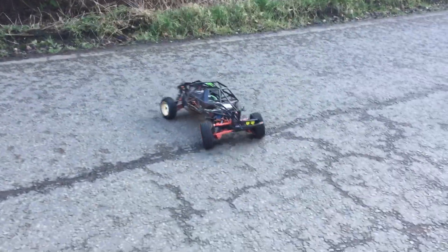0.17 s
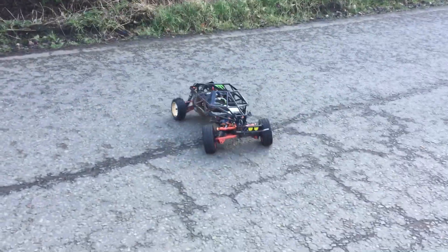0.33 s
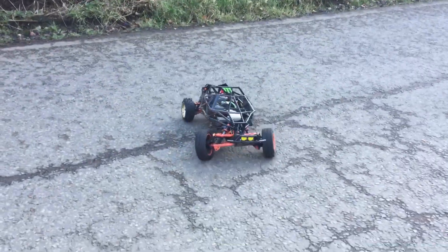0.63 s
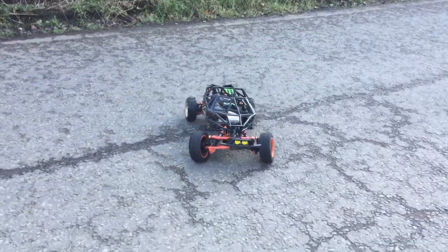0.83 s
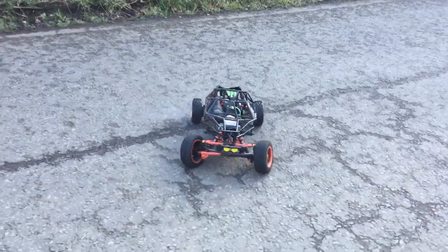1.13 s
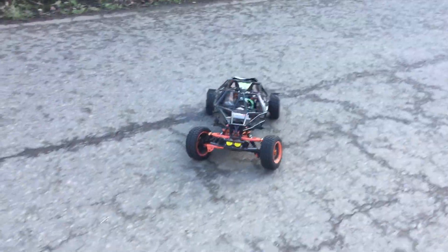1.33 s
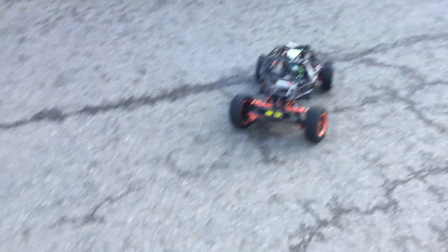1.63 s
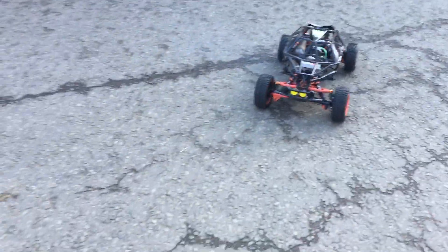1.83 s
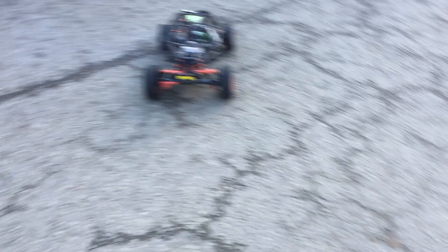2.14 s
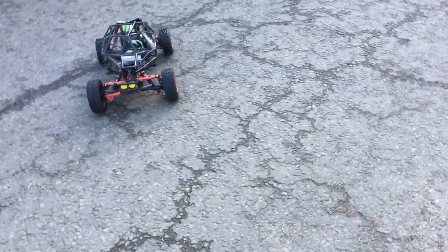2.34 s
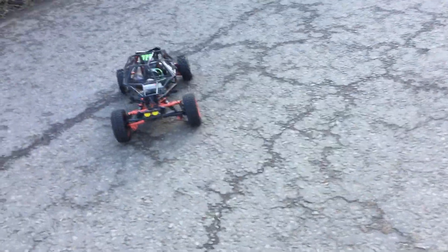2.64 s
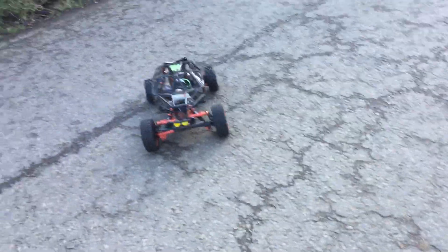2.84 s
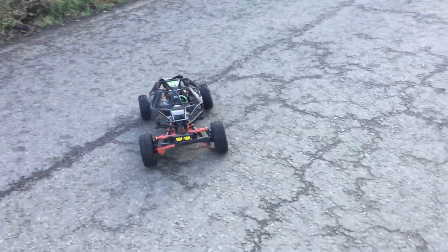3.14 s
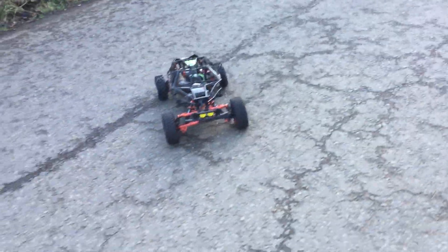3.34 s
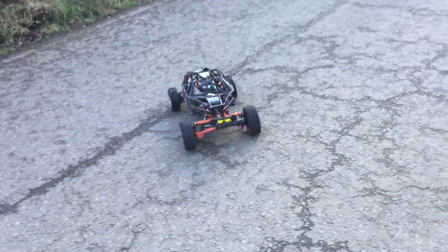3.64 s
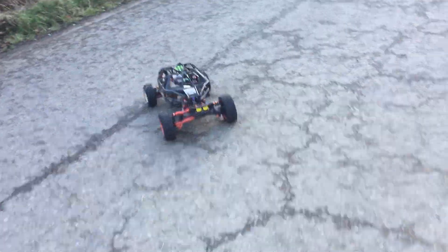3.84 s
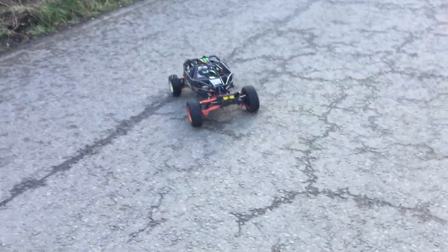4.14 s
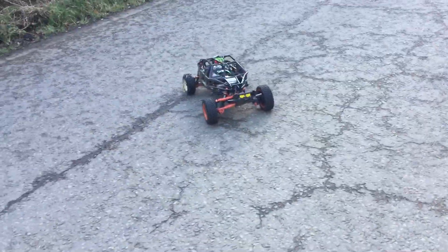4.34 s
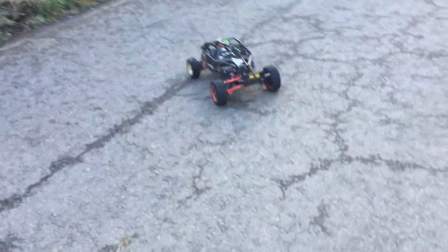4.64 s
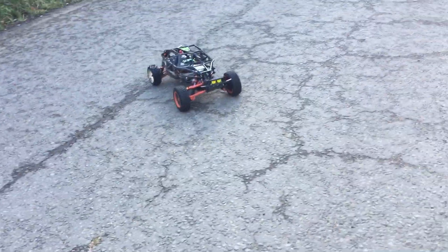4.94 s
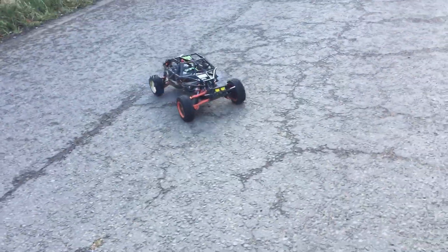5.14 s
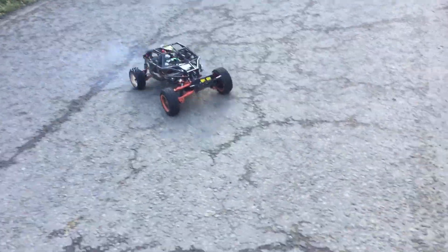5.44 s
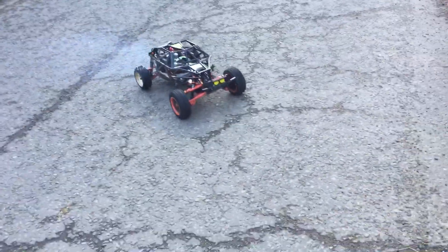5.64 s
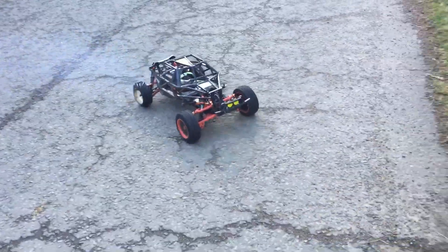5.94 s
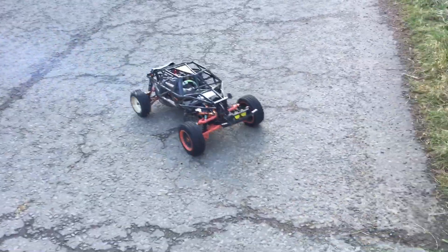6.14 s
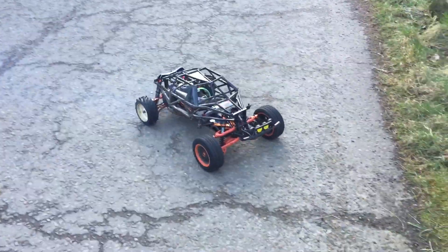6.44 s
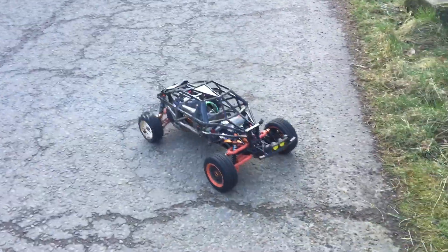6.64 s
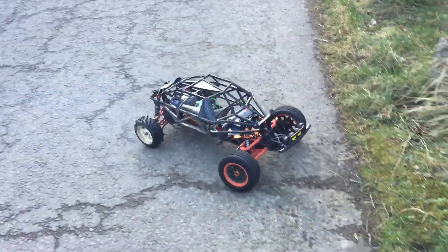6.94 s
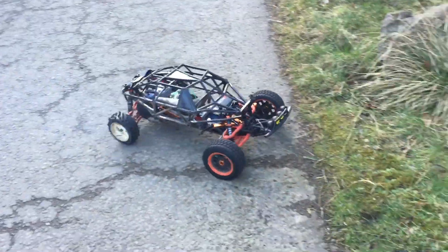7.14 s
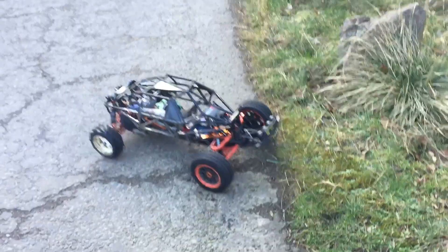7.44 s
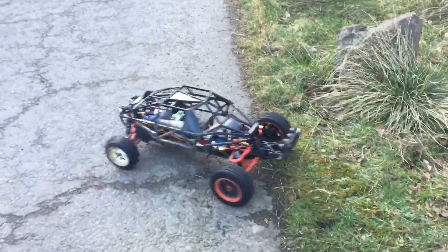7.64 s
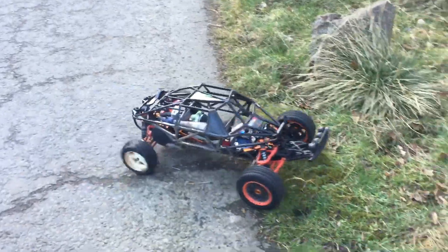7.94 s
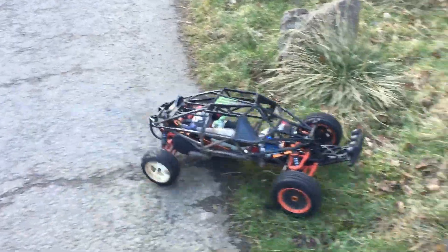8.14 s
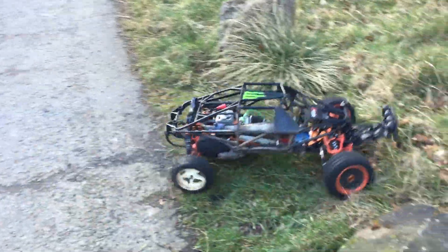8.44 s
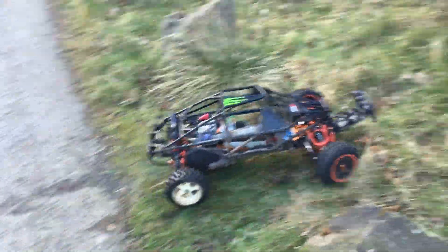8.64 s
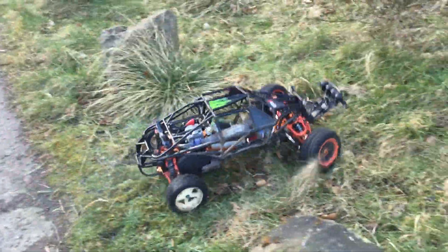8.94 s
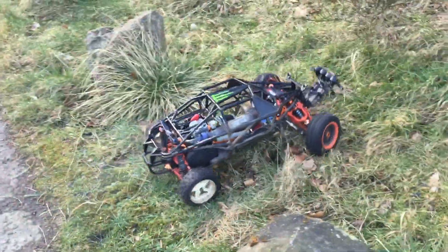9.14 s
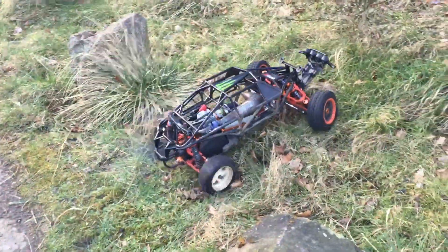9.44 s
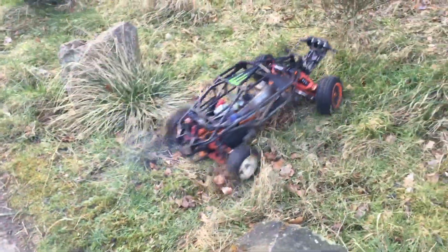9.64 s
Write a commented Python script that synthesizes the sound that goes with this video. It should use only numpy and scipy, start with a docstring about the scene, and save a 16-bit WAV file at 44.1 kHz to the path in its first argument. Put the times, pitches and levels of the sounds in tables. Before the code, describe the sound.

A model buggy's small two-stroke engine runs close to the microphone outdoors, thudding and clattering, with irregular sharp pops that ring in its metal silencer. At about 0.5 and 0.9 seconds, two quick throttle blips give a bright, buzzing rasp and coast down. From 1.5 to 4.5 seconds it idles unevenly with scattered pops; a faint gear whine passes around 2 seconds and a faint low hum around 4.5. A small blip at 4.5 leads into three sharp revs at 4.8, 5 and 5.4 seconds. A louder, more nasal rev barks at 6.2, followed by idle and a cluster of blips from 7.2 to 8 seconds. The clutch rings faintly near 6 and 8.6 seconds. Three more revs come at 8.7, 9.1 and 9.5 seconds, the last the longest and highest. The loudest peaks slightly overload the microphone.

```python
"""Two-stroke model buggy in a lane

A model buggy with a small petrol engine creeps along a lane and up a grass verge, near the microphone.
Off the throttle the engine thuds, clatters and fires only now and then, a sharp pop in the silencer.
On each blip of the throttle it fires on every turn, a bright rasp that overloads the microphone,
then coasts down. Beneath it the clutch bell rings twice, and a faint gear whine and a hum come and go."""
import sys
import numpy as np
from scipy import signal
from scipy.fft import rfft, irfft
from scipy.io import wavfile
from scipy.ndimage import uniform_filter1d

SR = 44100
rng = np.random.default_rng(int(sys.argv[2]) if len(sys.argv) > 2 else 0)


def waveform_to_disk(signal):
    """Save audio, clipped to [-1, 1], as 16-bit WAV at the path in sys.argv[1]."""
    frames = np.transpose(np.atleast_2d(signal))
    scaled = np.clip(frames, -1, 1) * 32767
    samples = np.round(scaled).astype(np.int16)
    wavfile.write(sys.argv[1], SR, samples)


N = 431735
TIME = np.arange(N) / SR

# Throttle blips, close to the microphone; levels are relative within each column:
# start_s, length_s, run_up_s, top_speed_hz, coast_time_constant_s, note_db, rasp_db, ring_db
THROTTLE_BLIPS = [ (0.502, 0.14, 0.14, 153, 0.25, -10, -6.5, -20),
                  (0.935, 0.15, 0.13, 169.6, 0.19, -13.5, -7, -14),
                  (4.495, 0.088, 0.082, 89.77, .25, -13, -15, -20),
                  (4.753, 0.13, .1, 161.4, 0.22, -12, -5.5, -16),
                  (5.029, .155, .068, 168.1, .302, -14.5, -7, -24.5),
                  (5.422, 0.17, 0.078, 169, 0.27, -17, -8, -23),
                  (6.222, 0.14, 0.087, 162.2, 0.23, -2.5, -6, -35),
                  (7.204, 0.056, 0.059, 104, .2, -18.5, -21, -36),
                  (7.371, 0.13, 0.11, 138, 0.15, -7.5, -14.5, -32),
                  (7.556, .13, .05, 162.9, .273, -3, -9, -23),
                  (7.937, 0.17, 0.083, 167.8, 0.31, -5, -10.5, -21),
                  (8.741, 0.17, 0.11, 165.8, 0.26, -7, -10.5, -18.5),
                  (9.121, 0.17, 0.086, 158.4, 0.22, -5.5, -11, -23.5),
                  (9.485, 0.29, 0.14, 175.7, 0.31, -5, -12.5, -22), ]
# Where the microphone sees the buggy from: time_s, view (0 ahead, 1 side, 2 behind)
MIC_VIEW = [(5.6,0),(6.3,1),(8.3,1),(9.25,1.4),(9.55,2)]
# The exhaust note from those three sides, and the rasp of its gas: frequency_hz, relative_db
AHEAD_SPECTRUM = [(180,-9.5),(300,-1.5),(450,-10.5),(660,-1.5),(1000,-1.5),(1500,2),(3500,-17)]
SIDE_SPECTRUM = [(200,-14),(300,-10),(450,-27.5),(650,-20),(970,-6.5),(1250,-13.5),(1750,-2),(2600,-7),(4000,-9.5)]
BEHIND_SPECTRUM = [(200,-20),(340,-3.5),(520,-26),(700,-4.5),(880,-3.5),(1050,-0.5),(1280,5.5),(1800,1),(2800,-15),(4000,-5.5),(5400,-25),(6300,-6),(7500,-6)]
RASP_SPECTRUM = [(1350, -18), (2300, -1.5), (3930, 0.5), (4400, 2), (5440, -5), (6090, -7), (8030, -5),
                 (13300, -8), (16000, -8.5)]
# Levels against a blip's peak: start_db, throttle_shut_db, run_on_end_db
NOTE_SHAPE, RASP_SHAPE, GULP_SHAPE = (-6.5, -5, -11.5), (-5.5, -3, -15), (0, -6.5, -8)

def exhaust(speed, tailpipe_hz=6160, width_hz=540):
    """Under throttle every turn fires: a pitched note, a rasp of gas and a metallic tailpipe ring."""
    *_, note_db, rasp_db, ring_db = np.transpose(THROTTLE_BLIPS)
    firings = strokes(speed, 0, jitter_s=.000008, spread_db=1)
    pulses = even(scatter(firings, t60=.025, share=1.4))
    ragged = np.clip((165 - speed) / 50, 0, 1)   # combustion cleans up as the revs rise
    gas = even(puffs(firings, t60=.045))
    pipe = pulses + (.12 + .6 * ragged) * gas
    view, = in_time(MIC_VIEW)
    sides = [even(colour(pipe, side)) for side in (AHEAD_SPECTRUM, SIDE_SPECTRUM, BEHIND_SPECTRUM)]
    note = even(sum(np.maximum(0, 1 - abs(view - k)) * side for k, side in enumerate(sides)))
    jet = .7 * pulses + .5 * even(firings) + .55 * port_bursts(speed) + (.3 + .7 * ragged) * gas
    rasp = even(colour(jet, RASP_SPECTRUM) + .27 * silencer(jet))
    ring = even(resonate(resonate(jet, tailpipe_hz, width_hz), tailpipe_hz, 2 * width_hz))
    return (from_db(-3) * throttle(note_db, NOTE_SHAPE) * note
            + throttle(rasp_db, RASP_SHAPE) * rasp
            + throttle(ring_db, RASP_SHAPE) * ring)


def port_bursts(speed, harmonics=64, size=2048):
    """Gas leaves the port in a jagged burst that repeats every turn and changes shape with each blip."""
    count = len(THROTTLE_BLIPS)
    bursts = rng.standard_normal((count, size)) * np.exp(-3 * np.arange(size) / size)
    overtones = rfft(bursts)[:, :harmonics] * from_db(3 * rng.standard_normal((count, harmonics)))
    overtones[:, 0] = 0
    blip = np.searchsorted([s for s, *_ in THROTTLE_BLIPS[1:]], TIME)
    turns = np.cumsum(speed) / SR
    return even(irfft(overtones, size)[blip, (turns % 1 * size).astype(int)])


def throttle(levels_db, shape, attack_s=.0027, run_on_s=.037, release_s=.055, peak_share=.44):
    """Gain over all blips: each starts abruptly, peaks, eases off and runs on for a few turns."""
    start, shut, end = from_db(shape)
    gain = np.zeros(N)
    for (s, length, *_), db in zip(THROTTLE_BLIPS, levels_db):
        stages = [-attack_s, 0, peak_share * length, length,
                  length + run_on_s, length + run_on_s + release_s]
        gain += from_db(db) * np.interp(TIME - s, stages, [0, start, 1, shut, end, 0])
    return gain


# Crank speed with the throttle shut, higher while the buggy rolls: time_s, speed_hz
IDLE_REVS = [(0, 52.7), (.29, 53), (.46, 58), (.7, 70.6), (1.8, 78), (2.35, 65), (2.54, 51.5), (3, 58.3),
             (4.1, 48.6), (4.43, 53), (4.7, 79), (5, 71.3), (7.17, 76), (7.7, 71)]

def crank_speed(inertia_s=.056):
    """Turns a second: each blip runs the engine up, it coasts back, the flywheel rounds each change."""
    idle, = in_time(IDLE_REVS)
    speed = idle
    for s, length, run_up, top, coast, *_ in THROTTLE_BLIPS:
        driven = np.interp(TIME, [s, s + run_up], [speed[int(s * SR)], top])
        coasting = np.exp(-np.maximum(TIME - s - length, 0) / coast)
        speed = np.where(TIME < s, speed, idle + (driven - idle) * coasting)
    return smooth(speed, int(inertia_s * SR))


# Loud single firings at close range: time_s, relative_db
LOUD_FIRINGS = [(0.023, -10), (0.395, -5), (0.4692, -1.5), (0.5255, -8), (1.6314, -12.5), (1.7694, -12.5),
                (1.8218, 2), (2.4398, -1.5), (2.5593, -1.5), (2.6258, -9.5), (2.6939, -0.5),
                (2.9777, -11.5), (3.0467, -15), (3.1732, -12), (3.2271, -15), (3.4101, -9), (3.5188, -2.5),
                (3.6454, -11.5), (3.702, -2.5), (3.9651, -6), (4.2355, -12.5), (4.4458, -2), (4.5474, -7),
                (4.568, 0.5), (4.773, 4), (4.9198, -2), (5.247, -4), (5.663, -4.5), (6.7654, -3.5),
                (6.9236, -15.5), (7.1659, -5.5), (7.235, -3), (7.2557, -2.5), (7.404, -5), (8.1689, -9.5)]
# Their blast of gas: frequency_hz, relative_db
BLAST_SPECTRUM = [(240, -24), (400, -11.5), (1160, -14), (1760, 7.5), (3260, -1), (4380, -23.5), (4730, -2),
                  (15000, -16), (16000, -23)]

def pops(speed, first_db=-7):
    """A lone firing cracks, blasts gas and rings the silencer; weak ones are mostly a dull knock."""
    first_of_blip = [(s, first_db) for s, *_ in THROTTLE_BLIPS]
    times, db = np.vstack([LOUD_FIRINGS, first_of_blip, weak_firings(speed)]).T
    kicks = clicks(times, from_db(db))
    blast = colour(puffs(kicks, t60=.057) + 14 * kicks, BLAST_SPECTRUM)
    ring = silencer(2 * puffs(kicks, t60=.0047) + 18 * kicks)
    blows = clicks(times, from_db(.3 * db))   # the knock varies far less than the blast
    knock = colour(puffs(blows, t60=.063) + 16 * blows, IDLE_METAL_SPECTRUM)
    return from_db(-8) * (blast + ring) + from_db(-18.5) * knock


def weak_firings(speed, below_hz=84, every_turns=4.9, relative_db=-21.5, spread_db=3):
    """A slow engine fires weakly every few turns; gives rows of time_s, relative_db."""
    turns = np.cumsum(speed) / SR
    chance = rng.standard_normal((N // 1000, 2))
    fired_turns = np.cumsum(np.maximum(2, np.round(every_turns + chance[:, 0])))
    times = np.interp(fired_turns, turns, TIME)
    firings = np.column_stack([times, relative_db + spread_db * chance[:, 1]])
    return firings[np.interp(fired_turns, turns, speed) < below_hz]


# Modes of the silencer shell: pitch_hz, width_hz, relative_db
SHELL_MODES = [(1722, 68, 16), (2803, 51, 11), (3504, 58, 12), (3970, 37, 6.5), (4330, 66, 14.5),
               (5080, 43, 5.5), (5630, 30, 3.5), (5655, 85, 8.5), (6200, 61, 2), (6600, 25, 2.5),
               (7500, 37, 0), (8100, 27, -0.5), (8900, 18, -7)]

def silencer(x):
    """The shell rings in all its modes at once; unit power for white noise."""
    t = TIME[:SR // 10]
    response = sum((-1) ** k * from_db(db) * np.exp(-np.pi * width * t) * np.sin(2 * np.pi * hz * t)
                   for k, (hz, width, db) in enumerate(SHELL_MODES))
    return signal.oaconvolve(x, response / np.linalg.norm(response))[:N]


# Clatter of piston, clutch and gears at the microphone: time_s, relative_db
CLATTER_LEVEL = [(0, -24), (.42, -21.5), (.72, -15.5), (.92, -15.5), (1.25, -21.5), (1.8, -19),
                 (4.2, -22.5), (4.75, -15.5), (5.3, -21), (5.8, -23), (6.2, -19.5), (6.55, -22.5),
                 (7.05, -22), (7.4, -17), (7.9, -22.5), (8.45, -25), (8.75, -19.5), (9.46, -21)]
# The engine's metal, idling and coasting: frequency_hz, relative_db
IDLE_METAL_SPECTRUM = [(240, -32.5), (400, -13), (676, -6.5), (1440, -9.5), (1560, -4), (2050, -4.5),
                       (2290, -13.5), (3580, -17.5), (3750, -25), (5690, -28.5), (16000, -44)]
COAST_METAL_SPECTRUM = [(240, -25), (400, -15.5), (432, -17.5), (687, -11.5), (1090, -11), (1510, 0.5),
                        (3210, -12), (3470, -14), (4240, -13), (4880, -18.5), (13100, -27), (16000, -33)]

def clatter(speed, slow):
    """The piston knocks at both ends of its stroke: a regular whirr at speed, a loose rattle at idle."""
    knocks = strokes(speed, 0, jitter_s=.000025, spread_db=1.5)
    knocks += .4 * strokes(speed, .45, jitter_s=.00006, spread_db=2)
    whirr = even(scatter(knocks, t60=.058, share=6.8, count=10))
    loose = strokes(speed, .3, jitter_s=.002, spread_db=4)
    rattle = even(puffs(loose, t60=.054))
    metal = whirr * from_db(-1 - 4 * slow) + rattle * from_db(-9 + 7 * slow)
    level_db, = in_time(CLATTER_LEVEL)
    return from_db(level_db - 2) * blend(metal, slow, IDLE_METAL_SPECTRUM, COAST_METAL_SPECTRUM)


# Pumped gas at idle and at speed, and the chassis shaking on its tyres: frequency_hz, relative_db
IDLE_THUD_SPECTRUM = [(50,-3),(110,-4.5),(220,1),(300,-4),(400,-16.5),(600,-40.5)]
FAST_THUD_SPECTRUM = [(60,9),(150,-0.5),(230,-5.5),(330,-9.5),(480,-22.5)]
CHASSIS_SPECTRUM = [(45,-16.5),(68,-2.5),(100,-8.5),(200,-5),(300,-8),(420,-31)]

def thud(speed, slow, choke_from_hz=77.2, choke_db_per_hz=.33, side_db=-3.5):
    """The piston pumps a soft pulse a turn and the chassis shakes; choked at speed unless on throttle."""
    pumps = strokes(speed, 0, jitter_s=.00004, spread_db=1)
    pulses = blend(pumps, slow, IDLE_THUD_SPECTRUM, FAST_THUD_SPECTRUM)
    shake = rms_one(colour(rng.standard_normal(N), CHASSIS_SPECTRUM))
    shake *= from_db(-7.5 + 6.3 * slow)
    shut = from_db(-27 - choke_db_per_hz * np.maximum(speed - choke_from_hz, 0))
    gulp = throttle([-26] * len(THROTTLE_BLIPS), GULP_SHAPE)
    turned_away = np.minimum(in_time(MIC_VIEW)[0], 1)
    return from_db(side_db * turned_away) * (shut + gulp) * (pulses + shake)


# How far the open flank faces the microphone: time_s, resonance_gain
FLANK_FACING = [(5.7,0),(6.1,0.8),(7.2,1.48),(8.1,0.84),(8.8,0.11),(9.25,0.65),(9.6,0.14)]

def flank(x):
    """Heard from the side, the engine bay adds a nasal bark."""
    return x + in_time(FLANK_FACING)[0] * resonate(x, centre_hz=1870, width_hz=330)


# The clutch drags, low under the engine: start_s, length_s, level_db
CLUTCH_DRAGS = [(6.03, .17, -32), (8.584, 0.33, -29.5)]

def clutch(speed):
    """The shoes brush the clutch bell once a turn and set it ringing."""
    brushes = puffs(strokes(speed, .2, jitter_s=.0005, spread_db=3), t60=.02)
    level = sum(from_db(db) * gate(s, s + length, attack_s=.02, release_s=.04)
                for s, length, db in CLUTCH_DRAGS)
    return level * rms_one(resonate(brushes, centre_hz=4070, width_hz=75))


# In the background, gears whine as the buggy rolls and a low hum swells: time_s, pitch_hz, level_db
GEAR_WHINE = [(1.5, 925, -36), (1.794, 923, -33), (2.3, 916.5, -42)]
LOW_HUM = [(3.7,70.38,-55),(4.5,70.86,-28),(5.6,75,-52)]

def faint_tone(rows):
    """A whine or hum: one drifting sine that fades in and out."""
    hz, db = in_time(rows)
    fade = gate(rows[0][0], rows[-1][0], attack_s=.088, release_s=.11)
    return from_db(db) * np.sqrt(2) * fade * np.sin(2 * np.pi * np.cumsum(hz) / SR)


def scatter(x, t60, share, count=14):
    """Reflections off chassis and road smear each pulse; their pattern shifts as the buggy moves."""
    t, out = TIME[:SR // 20], np.zeros(N)
    place = np.linspace(0, count - 1, N)
    for k in range(count):
        response = rng.standard_normal(len(t)) * from_db(-60 * t / t60)
        response *= share / np.linalg.norm(response)
        response[0] += 1   # the direct path to the microphone
        out += np.sqrt(np.maximum(0, 1 - abs(place - k))) * signal.oaconvolve(x, response)[:N]
    return out


def strokes(speed, crank_turns, jitter_s, spread_db):
    """One kick a turn at a given crank angle, a little uneven in time and strength."""
    turns = np.cumsum(speed) / SR
    times = np.interp(np.arange(int(turns[-1])) + crank_turns, turns, TIME)
    chance = rng.standard_normal((len(times), 2))
    return clicks(times + jitter_s * chance[:, 0], from_db(spread_db * chance[:, 1]))


def clicks(times, sizes):
    """Impulses placed between samples."""
    at, out = np.clip(times * SR, 0, N - 2), np.zeros(N)
    np.add.at(out, at.astype(int), sizes * (1 - at % 1))
    np.add.at(out, at.astype(int) + 1, sizes * (at % 1))
    return out


def puffs(kicks, t60):
    """Each kick lets go a puff of turbulence that dies by 60 dB in t60 seconds."""
    envelope = signal.lfilter([1], [1, -from_db(-60 / (t60 * SR))], kicks + 1e-18)
    return envelope * rng.standard_normal(N)


def colour(x, spectrum, size=8192):
    """Causal (minimum-phase) filter of unit power with the given spectrum."""
    hz, db = np.transpose(spectrum)
    log_hz = np.log(np.maximum(np.arange(size // 2 + 1), 1) * SR / size)
    skirt_db = 40 * np.minimum(0, np.minimum(log_hz - np.log(hz[0]), np.log(hz[-1]) - log_hz))
    gain = from_db(np.interp(log_hz, np.log(hz), db) + skirt_db)
    cepstrum = irfft(np.log(gain + 1e-5))
    cepstrum[1:size // 2] *= 2
    cepstrum[size // 2 + 1:] = 0
    response = irfft(np.exp(rfft(cepstrum)))
    return signal.oaconvolve(x, response / np.linalg.norm(response))[:N]


def blend(x, slow, idle_spectrum, fast_spectrum):
    """Crossfade between two colours with engine speed, at steady power."""
    return even(slow * even(colour(x, idle_spectrum)) + (1 - slow) * even(colour(x, fast_spectrum)))


def resonate(x, centre_hz, width_hz):
    """One resonance, gain one at its top."""
    return signal.lfilter(*signal.iirpeak(centre_hz, centre_hz / width_hz, fs=SR), x)


def gate(start_s, end_s, attack_s, release_s):
    """One from start to end, ramping in before and out after."""
    return np.clip((TIME - start_s) / attack_s + 1, 0, 1) * np.clip((end_s - TIME) / release_s + 1, 0, 1)


def smooth(x, size):
    """Two moving averages of size samples."""
    return uniform_filter1d(uniform_filter1d(x, size), size)


def even(x):
    """Hold the power at one over a few engine turns."""
    return x / np.sqrt(np.maximum(smooth(x ** 2, 1300), 1e-12))


def rms_one(x):
    """Scale to unit power."""
    return x / np.sqrt(np.mean(x ** 2) + 1e-20)


def in_time(rows):
    """Each column of a curve at every sample."""
    s, *columns = np.transpose(rows)
    return [np.interp(TIME, s, c) for c in columns]


def from_db(db):
    """Decibels to gain."""
    return 10 ** (np.asarray(db) / 20)


def scene():
    """The engine's sounds all follow one crankshaft; the whine and hum lie beneath them."""
    speed = crank_speed()
    slow = np.clip((100 - speed) / 40, 0, 1)   # 1 at low idle, 0 when spinning freely
    engine = flank(clatter(speed, slow) + pops(speed) + exhaust(speed))
    engine += thud(speed, slow) + clutch(speed)
    return (engine + faint_tone(GEAR_WHINE) + faint_tone(LOW_HUM))[None]


def record(dry, overload=.92, cutoff_hz=16000):
    """One close microphone overloads on the loudest peaks; the highest treble is cut."""
    clipped = dry / (1 + (dry / overload) ** 4) ** (1 / 4)
    return signal.sosfilt(signal.ellip(12, .1, 70, cutoff_hz, fs=SR, output="sos"), clipped)


dry = scene()
out = record(dry)
waveform_to_disk(out)
```